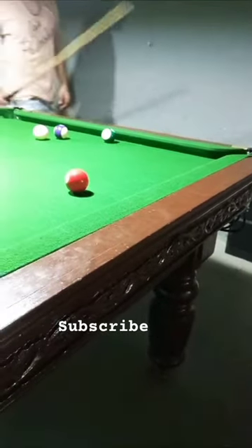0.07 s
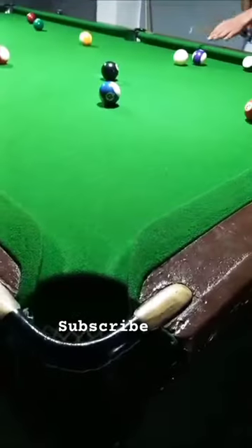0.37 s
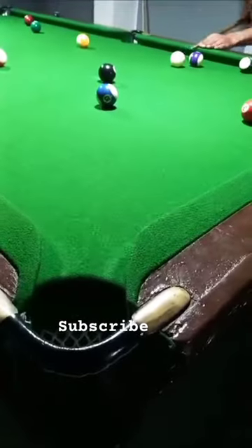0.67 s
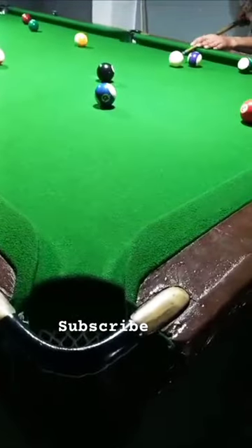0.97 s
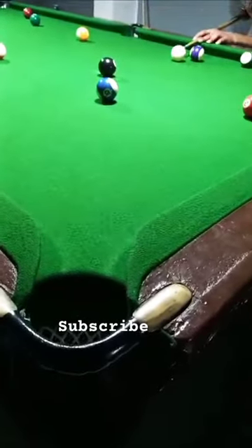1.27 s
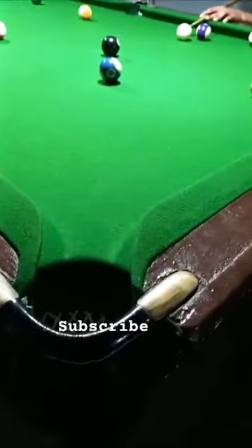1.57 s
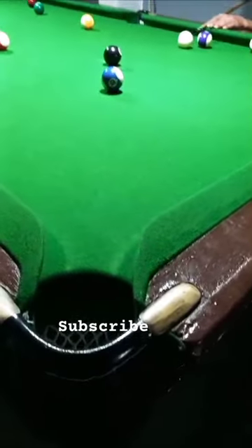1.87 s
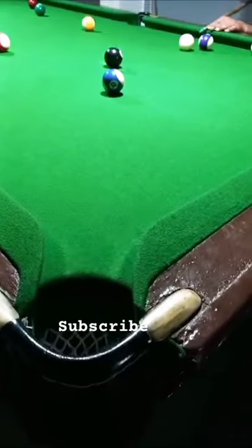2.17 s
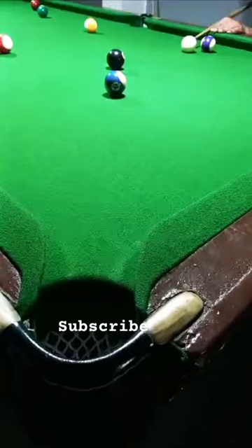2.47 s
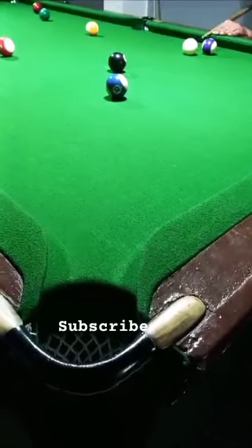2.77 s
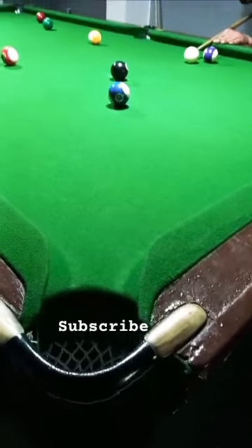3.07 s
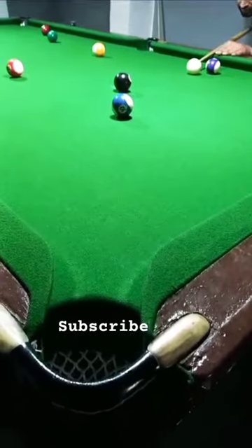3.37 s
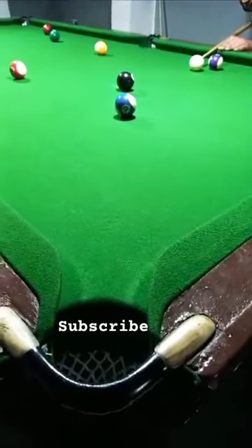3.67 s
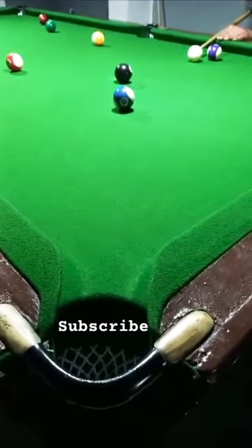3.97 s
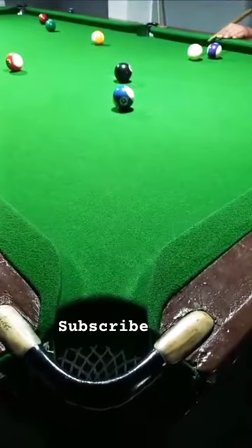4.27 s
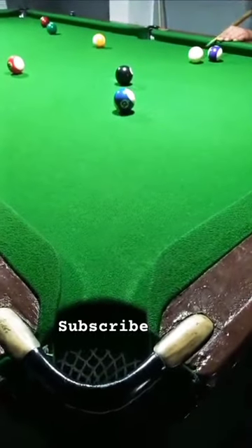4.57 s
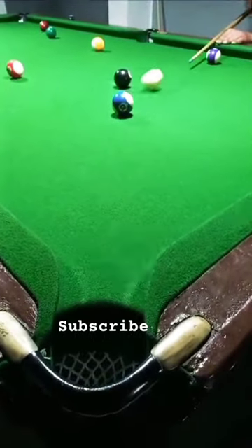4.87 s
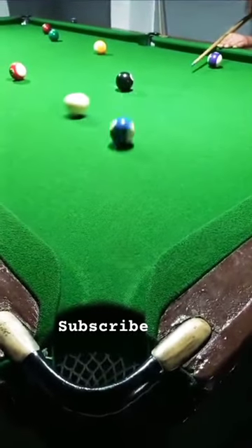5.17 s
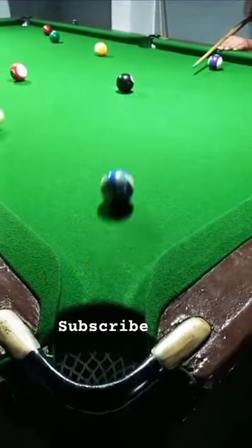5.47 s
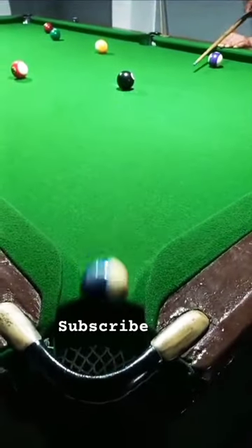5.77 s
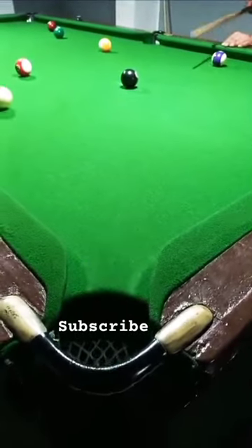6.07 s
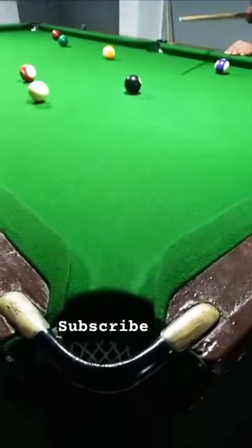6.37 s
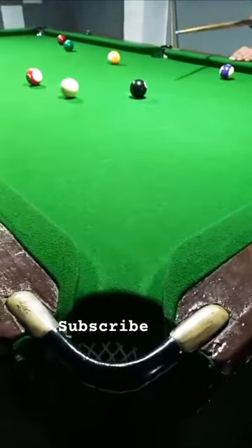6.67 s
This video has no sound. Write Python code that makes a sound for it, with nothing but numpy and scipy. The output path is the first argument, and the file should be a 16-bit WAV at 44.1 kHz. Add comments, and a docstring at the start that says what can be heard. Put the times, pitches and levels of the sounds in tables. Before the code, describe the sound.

A quiet room hum cuts abruptly to an echoing snooker hall, where fans drone over deep rumbles and distant knocks and ball clacks die away. After a few seconds a cue slides softly and strikes with a ringing knock. The cue ball hits another ball with a very loud clack that fills the hall. That ball rolls over the table and drops into the net pocket right by the microphone, knocking against the rail.

```python
"""A quiet, low room hum, cut off abruptly by a hard, echoing snooker hall heard from a corner pocket.
Fans drone over deep rumbles while bright knocks and far clacks die away. A cue slides, its leather tip
thumps and its shaft rings; over a faint hiss the white clacks into a ball so loudly that the limiter ducks.
That ball rumbles over the slate and drops into the net pocket, knocking the rail and ticking the fittings.
Hard hits are clicks ringing resonances; air, rumbles, scuffs and the hall's tail are shaped noise."""
import sys
import numpy as np
from scipy import signal
from scipy.fft import rfft, irfft
from scipy.io import wavfile
from scipy.ndimage import uniform_filter1d, minimum_filter1d

SR = 44100
rng = np.random.default_rng(int(sys.argv[2]) if len(sys.argv) > 2 else 0)


def dump_mix(stems):
    """Bounce the given channels to the path in sys.argv[1] as a 16-bit WAV at rate SR."""
    frames = np.atleast_2d(stems).T  # one column per channel
    limited = np.clip(frames, -1, 1)  # hard clip at full scale
    pcm = np.round(limited * 32767).astype(np.int16)
    wavfile.write(sys.argv[1], SR, pcm)


N = 305613
T = np.arange(N) / SR
HZ = np.maximum(np.fft.rfftfreq(N, 1 / SR), 1)
SIDES = np.array([[1], [-1]])   # left, right

HALL_ENTERS_S, TIP_S, SHAFT_S, CLACK_S = 0.3265, 4.7915, 4.7975, 5.1465

# Levels in the tables are relative: each layer sets its own gain.
# stereo width of diffuse sound: (frequency [Hz], left-right correlation [-1..1])
STEREO_LIKENESS = [(60, 0.82), (150, 1), (280, 0.92), (500, 0.55), (900, -0.011), (2000, -0.025),
                   (7000, 0.025)]
# its balance: (frequency [Hz], left minus right [dB])
STEREO_LEAN = [(150, 0.9), (300, -1), (1000, -3.5), (2000, -1.3), (6000, 0.1), (14000, -4.5)]
# the hall's decay: (frequency [Hz], t60 [s])
HALL_DECAY = [(200, 1.9), (1000, 1.3), (2200, 1.62), (4000, 1.62), (6500, 0.47), (14000, 0.4)]
# first reflections off lamp, walls and ceiling: (delay [s], left [dB], right [dB])
REFLECTIONS = [(.0009, -18, -8), (.0017, -14, -3), (.0053, -13, -12), (0.01, -14, -10), (0.014, -23, -19)]

# the opening room tone: (frequency [Hz], level [dB])
ROOM_TONE_COLOUR = [(24, -63), (40, -48), (60, -6), (92, -30), (107, -6), (128, -2.5), (214, -19),
                    (248, -13.5), (382, -19), (425, -23.5), (2000, -30), (6800, -49), (8840, -86),
                    (15000, -120)]
# the fans' rush of air: (frequency [Hz], level [dB])
FAN_AIR_COLOUR = [(44, -31), (75, -9.5), (135, -5), (166, -7.5), (260, 0.5), (292, -4), (373, -3),
                  (425, -7), (1530, -13), (1820, -17.5), (1960, -16), (3580, -28.5), (5000, -32.5),
                  (6070, -33), (6800, -36.5), (8840, -56), (15000, -120)]
# their wavering hums: (frequency [Hz], width [Hz], level [dB])
FAN_HUMS = [(106.8, 4.2, -35), (132.1, 7.7, -30.5), (153.2, 14, -32.5), (196.4, 5.6, -30.5),
            (224.7, 14, -33.5), (255.2, 13, -36), (319, 7.3, -43.5), (357.9, 13, -31.5), (374.7, 9.5, -28),
            (394.8, 20, -32), (593, 4.3, -46)]
# brief surges of the low drone: (time [s], boost [dB], half width [s])
FAN_SURGES = [(.74, 2.04, 0.048), (1.994, 5, 0.039), (2.75, 3, 0.058)]
# deep rumbles in the hall: (start [s], level [dB], length [s])
RUMBLES = [(0.29, -26.5, 0.3), (1.027, -34, 0.14), (1.783, -27, 0.25), (2.38, -29, 0.19), (3.25, -30, 0.17),
           (4.648, -40, .4)]
# their bass weight: (frequency [Hz], level [dB])
RUMBLE_COLOUR = [(25, -56), (44, -27), (58, 2), (78, 3), (120, -15.5), (400, -93.5)]
# far knocks: (time [s], level [dB])
FAR_KNOCKS = [(.295, 1), (.365, -5), (.435, -11.5)]
# their bright tail: (frequency [Hz], level [dB])
KNOCK_COLOUR = [(100, -14), (300, 2.5), (900, -2), (2000, 1), (3200, -2.5), (4500, -2.5), (6500, -1.5),
                (10000, -6), (15000, -20.5)]
# balls clacking far away: (time [s], level [dB])
FAR_BALL_HITS = [(.388, -2.5), (.435, -6)]
# ring of ball on ball: (frequency [Hz], width [Hz], level [dB])
BALL_MODES = [(1330, 590, -4), (2220, 920, 0.5), (2720, 590, 1.5), (3680, 2400, -16)]

# the cue rubbing over the bridge hand: (frequency [Hz], level [dB])
SLIDE_COLOUR = [(300, -13), (1500, -8.5), (6500, -10), (10000, -24), (15000, -52)]
# thump of the leather tip: (frequency [Hz], width [Hz], level [dB])
TIP_MODES = [(560, 340, 1.4), (950, 410, 1.6)]
# ring of the cue shaft: (frequency [Hz], width [Hz], level [dB])
SHAFT_MODES = [(870, 220, -2.5), (1470, 95, -0.5), (1700, 75, 1.5), (2065, 60, 0.5), (2450, 87, 3),
               (2830, 85, -5), (3340, 140, -4), (3846, 56, 0), (4300, 400, -8.5), (5290, 80, -6),
               (5660, 500, -10), (6300, 170, -10.5), (6670, 130, -8), (14000, 5100, -33)]
# swells of a faint high hiss: (start [s], level [dB])
HISS_SWELLS = [(4.8, -36), (5.17, -49), (6.1, -42)]
# its tone: (frequency [Hz], level [dB])
HIGH_HISS_COLOUR = [(2000, -11.5), (5200, 2), (6150, 13), (7500, 4), (10000, -3), (15000, -18.5)]
# the clack's first crack, straight across the cloth: (frequency [Hz], width [Hz], level [dB])
CRACK_MODES = [(1300, 1200, -6.5), (2600, 1900, 0)]
# its reverb sends, off the table's surroundings, a near and a far wall: (delay [s], level [dB])
WALL_SENDS = [(.003, -4.5), (0.0154, 2), (.058, -4)]
# a ball's rumble on the slate: (frequency [Hz], level [dB])
SLATE_COLOUR = [(200, -18), (550, -1), (1000, 0.5), (2000, -16), (5000, -50)]

# the ball slaps rim, net and rail: (time [s], level [dB], length [s], t60 [s], tilt [dB/octave])
POCKET_SLAPS = [(6.077, -21, 0.014, 0.063, -1), (6.242, -14.5, 0.012, 0.051, 0.5),
                (6.253, -29, 0.057, .3, 0.7), (6.543, -25.5, 0.01, 0.19, 0.5)]
# the slaps' tone before that tilt: (frequency [Hz], level [dB])
SLAP_COLOUR = [(100, -7), (350, -1), (700, 0), (1400, 3), (2300, 0), (3000, -5.5), (4500, -2), (6200, -2),
               (7500, -4), (10000, -5), (13000, -14), (15000, -12.5), (18000, -29)]
# knocks on the pocket's rail: (time [s], level [dB], contact cut-off [Hz], left minus right [dB])
RAIL_KNOCKS = [(6.0788, -10.5, 2000, -1), (6.2462, -11, 5000, 1), (6.2482, -6, 4000, -4),
               (6.2522, -7.5, 4500, 3), (6.5455, -15.5, 900, -9), (6.5505, -13, 955, -5)]
# ring of the rail: (frequency [Hz], width [Hz], level [dB])
RAIL_MODES = [(500, 110, -4), (665, 64, 14.5), (875, 250, 1), (1350, 120, 8.5), (1800, 150, -5),
              (2280, 200, -6), (3700, 310, -13)]
# the ball tugs at the net's metal fittings: (time [s], level [dB], left minus right [dB])
FITTING_TICKS = [(6.08, -17, 0), (6.0852, -16, -3), (6.248, -11, -5), (6.252, -4, -6), (6.5507, -20, -4),
                 (6.559, -18, -9), (6.565, -20, 5)]
# ring of the fittings: (frequency [Hz], width [Hz], level [dB])
FITTING_MODES = [(2050, 500, -1), (5360, 320, 1), (6300, 400, 5), (14800, 1400, -14)]


def from_db(db):
    """Decibels to gain."""
    return 10 ** (np.asarray(db) / 20)


def ramp(start, length):
    """A straight rise from 0 to 1."""
    return np.clip((T - start) / length, 0, 1)


def envelope(start, attack, length, t60):
    """Rises, holds until the length is over, then dies exponentially."""
    return ramp(start, attack) * np.exp(-np.log(1000) * np.maximum(T - start - length, 0) / t60)


def swell(start, rise, t60):
    """An envelope that rises quickly and dies exponentially."""
    age = np.maximum(T - start, 0)
    return (1 - np.exp(-age / rise)) * np.exp(-np.log(1000) * age / t60)


def wander(per_s):
    """A modulator that glides between random values."""
    knots = rng.standard_normal(size=8000)
    return np.interp(T * per_s, np.arange(len(knots)), knots)


def at_hz(points, hz=HZ):
    """Read a table on a log-frequency axis."""
    freqs, values = np.transpose(points)
    return np.interp(np.log(hz), np.log(freqs), values)


def delayed(x, s):
    """The same sound, s seconds later."""
    return np.pad(x, (max(round(s * SR), 0), 0))[:N]


def diffuse(spectrum_db):
    """Stereo noise from all around: narrow in the bass, wide in the treble; rms 1."""
    mid, side = rfft(rng.standard_normal((2, N)))
    alike = np.clip(at_hz(STEREO_LIKENESS), -1, 1)
    pair = np.sqrt(1 + alike) * mid + np.sqrt(1 - alike) * side * SIDES
    noise = irfft(pair * from_db(spectrum_db + SIDES * at_hz(STEREO_LEAN) / 2), N)
    return noise / np.sqrt(np.mean(noise ** 2) + 1e-20)


def strike(time_s, level_db, modes, contact_hz):
    """One blow rings a body's resonances; the contact time rounds off the treble."""
    click, ring = np.full(N, 1e-18), 0
    click[round(time_s * SR)] = 1
    for k, (hz, width, db) in enumerate(modes):
        r = np.exp(-np.pi * width / SR)
        poles = [1, -2 * r * np.cos(2 * np.pi * hz / SR), r * r]
        ring = ring + (-1) ** k * from_db(db) * (1 - r * r) * signal.lfilter([1, 0, -1], poles, click)
    ring = signal.sosfilt(signal.butter(6, contact_hz, fs=SR, output="sos"), ring)
    return from_db(level_db) * ring / np.abs(ring).max()


def hall_response(build_s, early_db, early_t60_share):
    """Each octave of the tail dies at its own rate; dense early sound around the table dies sooner."""
    noise, tail = rfft(diffuse(0)), 0
    octave = np.clip(np.log2(HZ / 125), 0, 7)
    for k in range(8):
        t60 = at_hz(HALL_DECAY, 125 * 2 ** k)
        band = irfft(noise * np.maximum(1 - np.abs(octave - k), 0), N)
        early = from_db(early_db) * swell(0, build_s, early_t60_share * t60)
        tail = tail + band * (swell(0, build_s, t60) + early)
    return tail / np.sqrt(np.sum(tail ** 2) / 2)


def reverb(send, hall):
    """The hall's wet return."""
    return signal.fftconvolve(np.atleast_2d(send), hall, axes=1)[:, :N]


def across_table(x, right_db, lag_s):
    """Direct sound, reaching the right microphone a little later, plus first reflections."""
    left = x + sum(from_db(db) * delayed(x, s) for s, db, _ in REFLECTIONS)
    right_direct = from_db(right_db) * delayed(x, lag_s)
    right = right_direct + sum(from_db(db) * delayed(x, s - lag_s) for s, _, db in REFLECTIONS)
    return np.array([left, right])


def room_tone(level_db):
    """A quiet bed of low, humming noise."""
    return from_db(level_db) * diffuse(at_hz(ROOM_TONE_COLOUR))


def fans(air_db, hum_db, hiss_db, surge_below_hz):
    """Rushing air, narrow wavering hums and a faint hiss; the low end surges now and then."""
    hum_power = sum(from_db(db) ** 2 / width / (1 + (2 * (HZ - hz) / width) ** 2) ** 2
                    for hz, width, db in FAN_HUMS)
    air = from_db(air_db) * diffuse(at_hz(FAN_AIR_COLOUR))
    drone = air + from_db(hum_db) * diffuse(10 * np.log10(hum_power))
    low_end = irfft(rfft(drone) / (1 + (HZ / surge_below_hz) ** 2) ** 2, N)
    surge_db = sum(db * np.exp(-((T - s) / width) ** 2) for s, db, width in FAN_SURGES)
    surges = (from_db(surge_db) - 1) * low_end
    hiss = from_db(hiss_db) * diffuse(0)
    fader_db = -19 - 1.88 * (1 - ramp(start=1.55, length=0.56))   # the level starts softer, rises once near 1.6 s, then holds
    return from_db(fader_db) * (drone + surges + hiss)


def deep_rumbles(level_db):
    """Bass noise swells and dies in overlapping waves that add in power."""
    power = sum((from_db(db) * envelope(s, attack=0.059, length=length, t60=2.8)) ** 2
                for s, db, length in RUMBLES)
    return from_db(level_db) * np.sqrt(power) * diffuse(at_hz(RUMBLE_COLOUR))


def dying_knocks(hall, level_db):
    """Only the reverb tails of a few bright knocks reach the table."""
    tail = irfft(rfft(hall) * from_db(at_hz(KNOCK_COLOUR)), N)
    tail = from_db(level_db) * tail / np.std(tail[:, :SR // 10])
    return sum(from_db(db) * np.array([delayed(side, s) for side in tail]) for s, db in FAR_KNOCKS)


def far_clacks(hall):
    """Balls meet somewhere else in the hall and arrive fully wet."""
    return reverb(sum(strike(s, db, BALL_MODES, contact_hz=2620) for s, db in FAR_BALL_HITS), hall)


def deep_hum(hz, waver_hz, level_db):
    """A clean, slightly wavering bass tone stands out once from the rumble."""
    pitch_hz = hz + waver_hz * wander(per_s=11)
    tone = np.sqrt(2) * np.sin(2 * np.pi * np.cumsum(pitch_hz) / SR)
    return from_db(level_db) * envelope(start=2.925, attack=0.07, length=0.22, t60=1.15) * tone


def cue_slide(stroke_s, level_db):
    """The cue rubs over the bridge hand, gathering speed until its tip hits."""
    start = TIP_S - stroke_s
    speed = ramp(start, stroke_s)
    rubbing = speed * envelope(start, attack=stroke_s, length=stroke_s, t60=0.22)
    return from_db(level_db) * rubbing * diffuse(at_hz(SLIDE_COLOUR))


def cue_strike(hall, tip_wet_db, shaft_wet_db):
    """The leather tip thumps; the shaft's bright ring arrives mostly by way of the hall."""
    tip = strike(TIP_S, level_db=0.5, modes=TIP_MODES, contact_hz=2300)
    shaft = strike(SHAFT_S, level_db=-13, modes=SHAFT_MODES, contact_hz=15200)
    send = from_db(tip_wet_db) * tip + from_db(shaft_wet_db) * shaft
    return across_table(tip + shaft, right_db=0.5, lag_s=0.00005) + reverb(send, hall)


def high_hiss(rise_s, t60_s):
    """A faint high hiss swells with the cue strike, clack and pocket drop, then slowly fades."""
    level = sum(from_db(db) * swell(s, rise_s, t60_s) for s, db in HISS_SWELLS)
    return level * diffuse(at_hz(HIGH_HISS_COLOUR))


def clack(hall, level_db, wet_db, crack_db):
    """Two hard balls meet for a fraction of a millisecond and set the whole hall ringing."""
    crack = strike(CLACK_S, level_db + crack_db, CRACK_MODES, contact_hz=3600)
    ring = strike(CLACK_S, level_db + wet_db, BALL_MODES, contact_hz=4150)
    send = sum(from_db(db) * delayed(ring, s) for s, db in WALL_SENDS)
    return across_table(crack, right_db=-8.5, lag_s=0.00015) + reverb(send, hall)


def slate_rumble(fade_s, level_db):
    """The struck ball rumbles on the slate until it reaches the pocket."""
    drop_s = POCKET_SLAPS[0][0]
    on_slate = ramp(CLACK_S, fade_s) * (1 - ramp(drop_s, fade_s))
    return from_db(level_db) * on_slate * diffuse(at_hz(SLATE_COLOUR))


def pocket_drop(hall, bright_wet_db, rail_wet_db, grain_db):
    """Close up, the ball scuffs into the pocket, knocks on the rail and tugs the net's fittings."""
    slaps = 0
    for s, db, length, t60, tilt in POCKET_SLAPS:
        noise = diffuse(at_hz(SLAP_COLOUR) + tilt * np.log2(HZ))
        slaps = slaps + from_db(db) * envelope(s, attack=0.0019, length=length, t60=t60) * noise
    scuffs = slaps * from_db(grain_db * wander(per_s=500))   # the net's cords catch and slip
    knocks = sum(strike(s, db, RAIL_MODES, contact_hz) * from_db(SIDES * pan_db / 2)
                 for s, db, contact_hz, pan_db in RAIL_KNOCKS)
    ticks = sum(strike(s, db, FITTING_MODES, contact_hz=15100) * from_db(SIDES * pan_db / 2)
                for s, db, pan_db in FITTING_TICKS)
    bright = scuffs + ticks
    send = from_db(bright_wet_db) * bright + from_db(rail_wet_db) * knocks
    return bright + knocks + reverb(send, hall)


def scene():
    """Quiet room tone, then a hard cut to the hall and the shot."""
    hall = hall_response(build_s=0.0042, early_db=-5.5, early_t60_share=0.45)
    quiet = room_tone(level_db=-31)
    ambience = (fans(air_db=1, hum_db=-5.5, hiss_db=-51, surge_below_hz=550)
                + deep_rumbles(level_db=-3.5)
                + dying_knocks(hall, level_db=-17)
                + far_clacks(hall)
                + deep_hum(hz=66, waver_hz=0.6, level_db=-22))
    shot = (cue_slide(stroke_s=0.56, level_db=-34)
            + cue_strike(hall, tip_wet_db=-0.5, shaft_wet_db=18)
            + high_hiss(rise_s=0.031, t60_s=6.3)
            + clack(hall, level_db=16.1, wet_db=-5, crack_db=1.5)
            + slate_rumble(fade_s=0.031, level_db=-28.5)
            + pocket_drop(hall, bright_wet_db=-2.5, rail_wet_db=-10, grain_db=2.5))
    return np.where(T < HALL_ENTERS_S, quiet, ambience + shot)


def limiter(x, ceiling_db, attack_db_per_s, release_db_per_s, slow_share, slow_db_per_s):
    """The gain ducks just ahead of a peak; most of it springs back, a small share creeps back."""
    over_db = np.maximum(20 * np.log10(np.abs(x).max(axis=0) + 1e-9) - ceiling_db, 0)
    ahead = np.maximum.accumulate((over_db - attack_db_per_s * T)[::-1])[::-1] + attack_db_per_s * T
    fast = np.maximum.accumulate(over_db + release_db_per_s * T) - release_db_per_s * T
    slow = np.maximum.accumulate(slow_share * over_db + slow_db_per_s * T) - slow_db_per_s * T
    gain_db = minimum_filter1d(-np.maximum.reduce([ahead, fast, slow]), size=64)
    return x * from_db(uniform_filter1d(gain_db, size=64))


def record(dry):
    """A phone: a steep step down in the treble, a faint peak at the very top, a limiter, a high cut."""
    body = signal.sosfilt(signal.ellip(7, .3, 70, 6920, fs=SR, output="sos"), dry)
    treble = signal.sosfilt(signal.butter(6, 8800, "high", fs=SR, output="sos"), dry)
    top = signal.lfilter(*signal.iirpeak(14950, 16, fs=SR), treble)
    coloured = body + from_db(-16) * treble + from_db(-3) * top
    limited = limiter(coloured, ceiling_db=-4.5, attack_db_per_s=1300, release_db_per_s=620,
                      slow_share=0.22, slow_db_per_s=2.5)
    return signal.sosfilt(signal.ellip(10, .2, 80, 15700, fs=SR, output="sos"), limited)


dry = scene()
out = record(dry)
dump_mix(out)
```